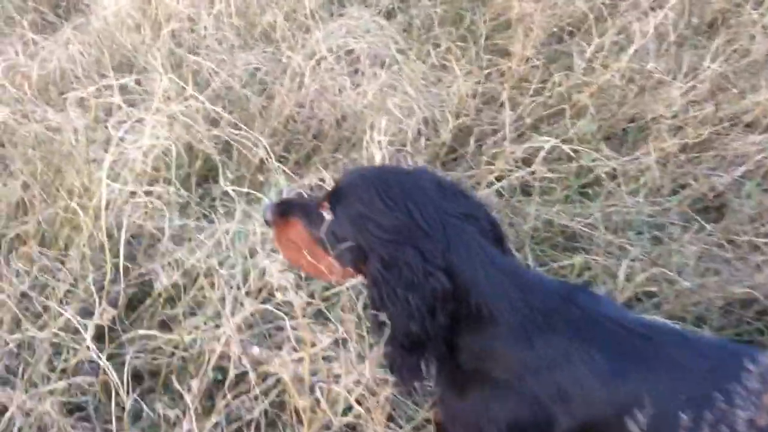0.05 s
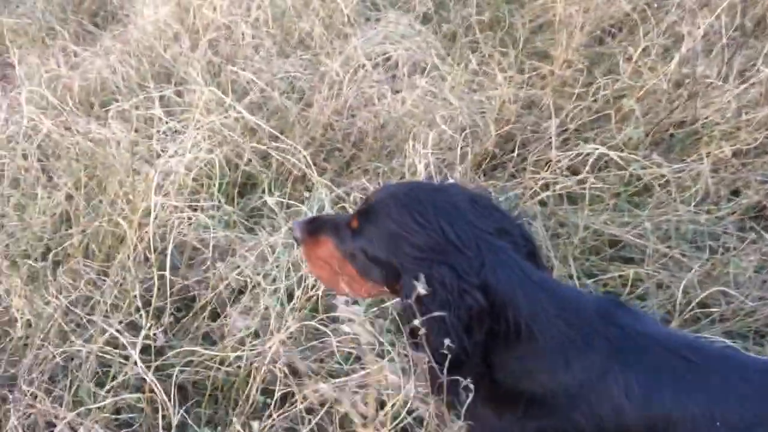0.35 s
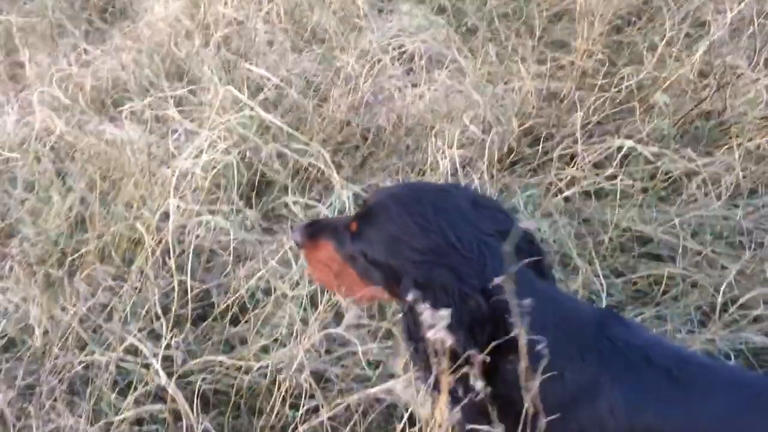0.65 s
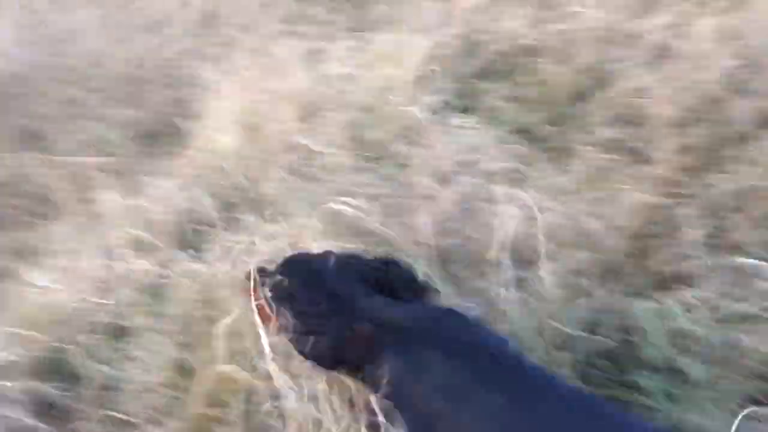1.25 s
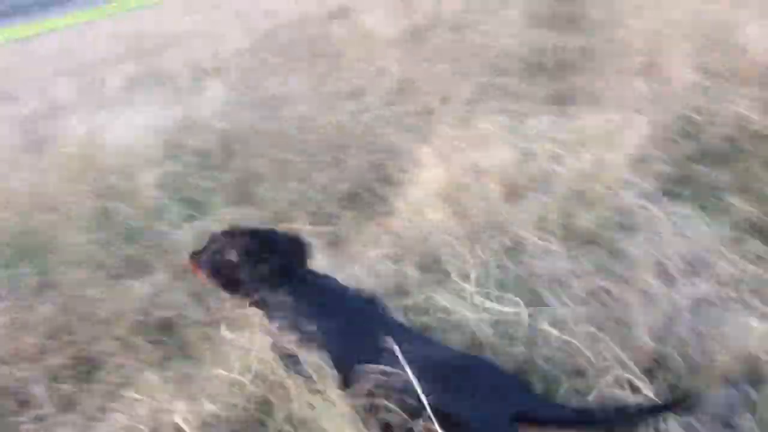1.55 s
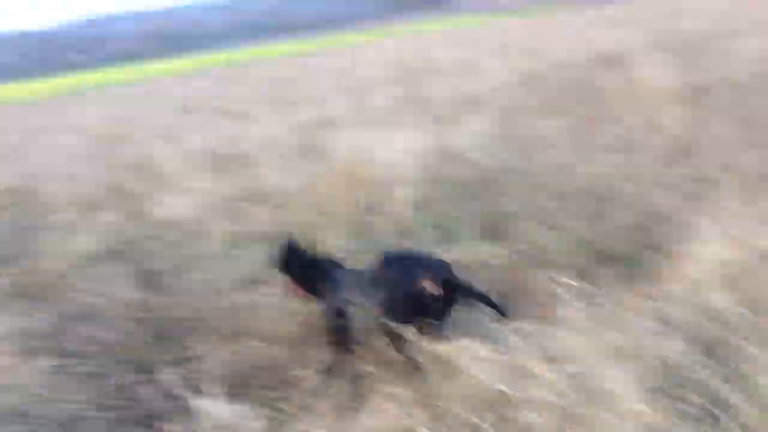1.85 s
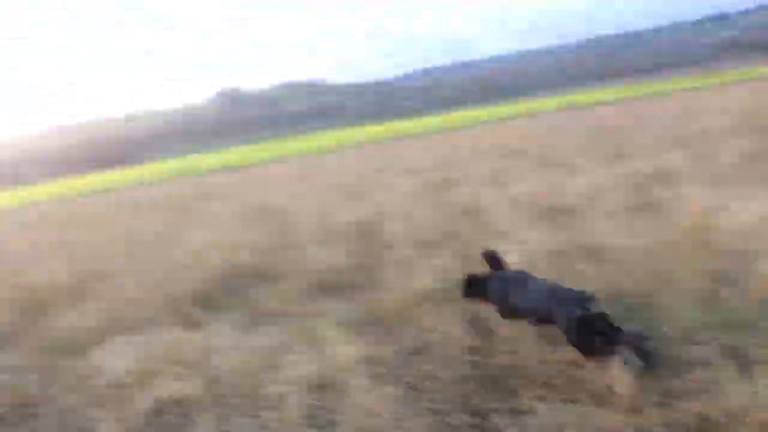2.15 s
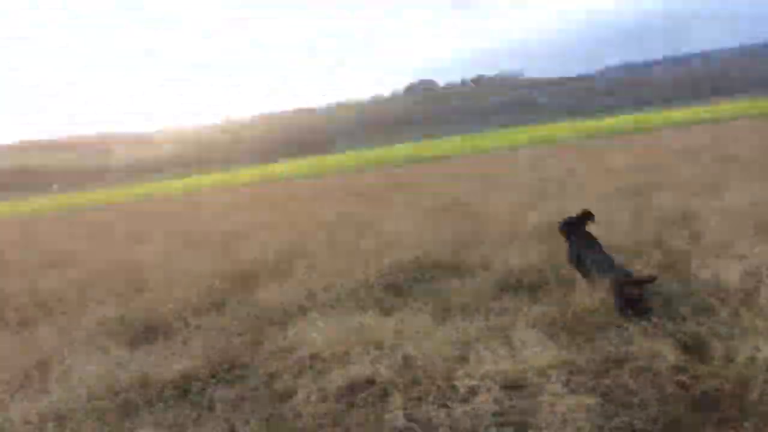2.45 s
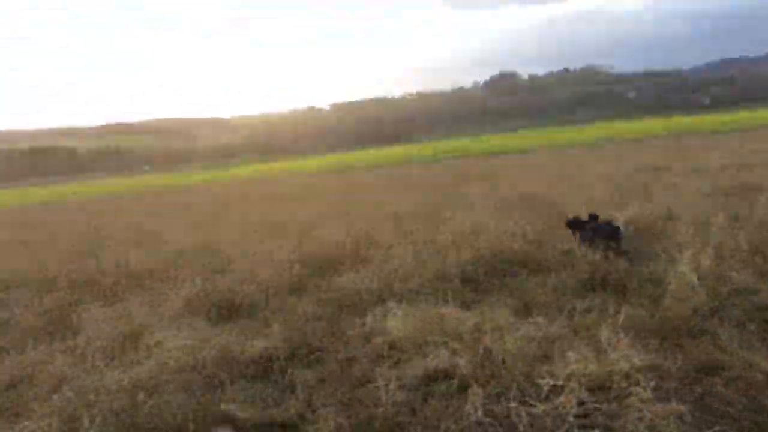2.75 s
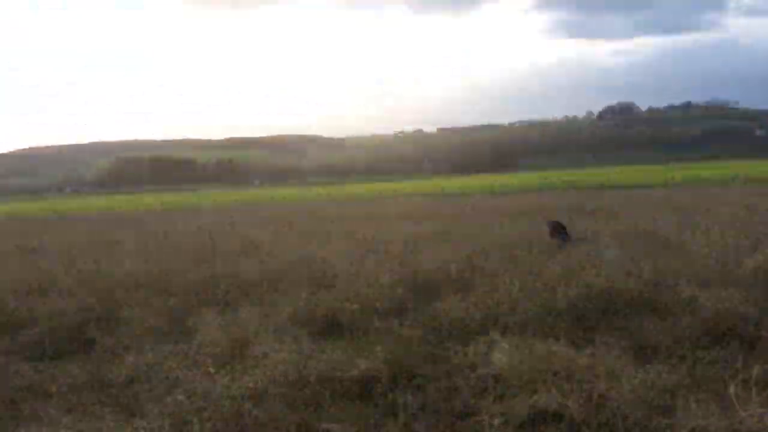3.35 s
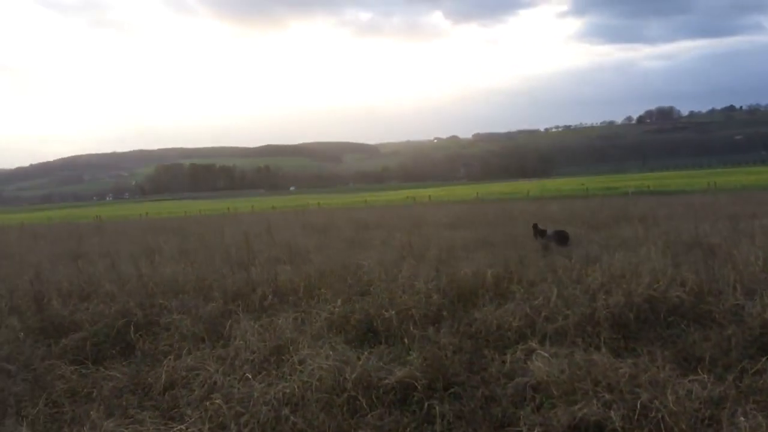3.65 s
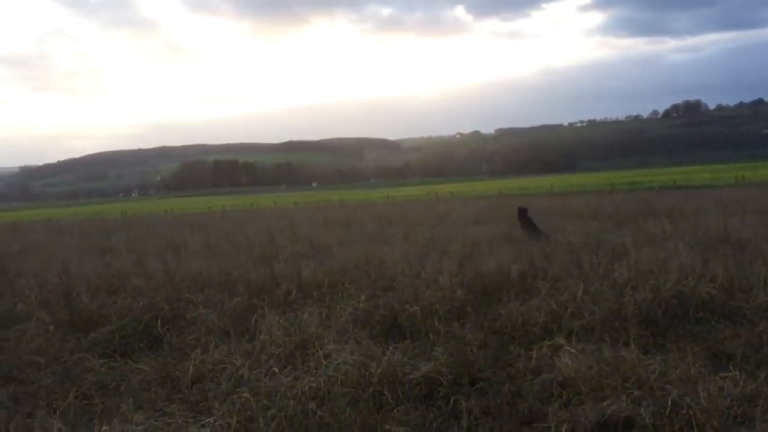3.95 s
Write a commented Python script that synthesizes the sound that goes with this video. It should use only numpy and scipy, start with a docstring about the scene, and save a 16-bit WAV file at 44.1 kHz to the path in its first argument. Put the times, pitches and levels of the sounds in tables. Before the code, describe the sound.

A bird bursts from dry grass with a few wing claps, then whirrs away in fast, fading beats. Stems snap and rustle as a dog bounds after it across an open field, and wind buffets the microphone.

```python
"""Game bird flushed from dry grass

A stem cracks in an open field and a bird claps and thrashes clear of the cover, then whirrs away,
each wingbeat a short hum, a swish and a feather whistle. A dog bounds after it, tearing through
the stalks into the distance. Wind buffets the microphone over a soft hush and a few far peeps."""
import sys
import numpy as np
from scipy import signal
from scipy.fft import rfft, irfft
from scipy.io import wavfile
from scipy.ndimage import uniform_filter1d

SR = 44100
rng = np.random.default_rng(int(sys.argv[2]) if len(sys.argv) > 2 else 0)


def transcribe(signal):
    """Save signal, clipped to [-1, 1], as a 16-bit WAV file at the path in sys.argv[1]."""
    frames = np.atleast_2d(signal).T
    limited = np.clip(frames, -1, 1)
    pcm = np.round(limited * 32767).astype(np.int16)
    wavfile.write(sys.argv[1], SR, pcm)


N = 176400
TIME = np.arange(N) / SR

# Fader for the open-air hush. Each row: time in seconds, level in dB.
HUSH_FADER = [(0, -57.5), (.8, -56), (3.0, -54), (3.2, -58)]
# Tone of the hush. Each row: frequency in Hz, gain in dB.
HUSH_EQ = [(100, 13), (250, -3.5), (500, -2), (1000, -0.5), (1800, -8), (3000, -13.5), (8000, -15.5),
           (16000, -23)]
# Distant birds. Each row: time in seconds, level in dB, pitch in Hz.
FAR_PEEPS = [(2.527, -54.5, 2900), (2.601, -56, 2870), (2.695, -59, 1880), (3.371, -55, 2900)]

# Fader for wind on the microphone. Each row: time in seconds, level in dB.
RUMBLE_FADER = [(0, -61), (.85, -61), (1.0, -51), (1.9, -53.5), (2.25, -48.5), (2.8, -49), (2.87, -38),
                (2.97, -37.5), (3.03, -45.5), (3.12, -37.5), (3.2, -52.5), (3.4, -42.5), (3.53, -45),
                (3.62, -39), (3.8, -42), (3.93, -32), (4, -42.5)]
# Tone of that wind. Each row: frequency in Hz, gain in dB.
RUMBLE_EQ = [(28, -16), (42, 1), (65, 10.5), (110, -4), (170, -9), (260, -27), (700, -74)]
# The strong gust, reaching higher. Each row: frequency in Hz, gain in dB.
GUST_EQ = [(90, 2), (150, 6), (250, -5), (400, -46), (800, -55)]
# Eddies from wind or wings. Each row: time in seconds, level in dB, pitch in Hz, half length in seconds.
EDDY_THUMPS = [(0.785, -42, 81, 0.0085), (0.902, -35, 184, 0.0053), (1.001, -37.5, 197, 0.01),
               (1.089, -32.5, 166, 0.0069), (1.64, -32, 186, 0.0075), (1.772, -35, 72.6, 0.012),
               (2.26, -38, 68.4, 0.017), (2.298, -37, 84, 0.017), (2.479, -32.5, 79, 0.01),
               (2.618, -41, 540, 0.0043), (2.673, -34.5, 68, 0.022), (2.912, -41.5, 136, 0.01),
               (2.968, -32.5, 70, 0.021), (3.081, -31.5, 79, 0.0093), (3.37, -37.5, 83, 0.013),
               (3.585, -36.5, 91, 0.0097), (3.618, -36, 177, 0.011), (3.696, -26.5, 115, 0.016),
               (3.714, -29.5, 450, 0.0041), (3.723, -27.5, 171, 0.006), (3.758, -40.5, 182, 0.02),
               (3.878, -36.5, 181, 0.0086), (3.905, -26.5, 110, 0.0075)]

# Grass stirring before the flush. Each row: time in seconds, level in dB, half length in seconds.
STIR_CUES = [(0.123, -57, 0.073)]
# Tone of the stir. Each row: frequency in Hz, gain in dB.
STIR_EQ = [(1200, -0.5), (2800, -0.5), (4500, -3.5), (9000, -10)]
# Fader for grass brushing past the dog. Each row: time in seconds, level in dB.
RUSTLE_FADER = [(0, -66.5), (.55, -57), (.73, -48), (.86, -57.5), (.9, -39.5), (.935, -60), (1.08, -50.5),
                (1.15, -38), (1.21, -59), (1.29, -50), (1.37, -37.5), (1.48, -35), (1.55, -32), (1.64, -34),
                (1.66, -38), (1.76, -37), (1.95, -43), (2.02, -47), (2.13, -47), (2.31, -57), (2.38, -49),
                (2.44, -56), (2.5, -46.5), (2.57, -53), (2.62, -48), (2.69, -57), (2.95, -52.5),
                (3.17, -56.5), (3.37, -52), (3.6, -53.5), (3.94, -56.5), (4, -52)]
# Tone of the rustle. Each row: frequency in Hz, gain in dB.
RUSTLE_EQ = [(700, -3.5), (1300, -9.5), (2100, -8.5), (3200, -4.5), (4800, -4), (7000, -1), (11000, -1),
             (15000, -3.5)]
# Tufts hit by wings and paws. Each row: time in seconds, level in dB, half length in seconds.
TUFT_HITS = [(0.898, -39, 0.012), (0.92, -39, 0.014), (0.953, -38.5, 0.01), (0.986, -36.5, 0.0036),
             (1.008, -40.5, 0.013), (1.068, -36, 0.0023), (1.088, -33, 0.0024), (1.111, -36.5, 0.0091),
             (1.135, -36.5, 0.0083), (1.165, -36, 0.011), (1.61, -33, 0.022), (1.633, -31.5, 0.0076),
             (2.339, -48, 0.0036), (3.006, -47, 0.0044), (3.467, -52, 0.0077)]
# Tone of their crunch. Each row: frequency in Hz, gain in dB.
TUFT_EQ = [(100, -5), (190, 16.5), (300, -0.5), (1500, 7), (3000, 4), (7000, 4.5), (11000, 4), (16000, -27)]
# Dry stems breaking. Each row: start in seconds, level in dB, ring pitch in Hz.
STEM_SNAPS = [(0.225, -34, 9500), (0.6062, -24.5, 4570), (0.6124, -17, 12100), (0.6171, -12.5, 5840),
              (0.6167, -10.5, 9700), (.8965, -25, 7200), (0.9452, -17, 8300), (0.9835, -22.5, 7200),
              (1.0665, -22, 7500), (1.0858, -21, 7900), (1.131, -13.5, 7050), (1.1368, -12.5, 8000),
              (1.1692, -15.5, 9000), (1.3605, -18, 6240), (1.4441, -13, 10300), (1.509, -19, 9000),
              (1.5344, -5.5, 6900), (1.646, -12.5, 8700), (2.1, -12.5, 9550), (2.217, -26.5, 7800),
              (2.238, -28, 5840), (2.3396, -35, 9700), (2.8818, -24.5, 8700), (3.004, -43, 9500),
              (3.358, -29.5, 9000), (3.683, -35, 6130)]
# Tone of the splintering. Each row: frequency in Hz, gain in dB.
SPLINTER_EQ = [(1200, -13), (3000, -8), (6500, 3), (15000, -0.5)]

# Fader for the low flutter of air under the wings. Each row: time in seconds, level in dB.
FLUTTER_FADER = [(.87, -79), (.9, -40), (1.2, -38.5), (1.33, -48), (1.45, -42), (1.55, -51.5), (1.7, -45.5),
                 (2.4, -84)]
# Tone of the flutter. Each row: frequency in Hz, gain in dB.
FLUTTER_EQ = [(50, -1), (110, -3), (170, -0.5), (240, -1), (350, -13), (700, -14.5), (1400, -20),
              (3000, -24)]
# Wing downstrokes. Each row: time in seconds, hum level in dB.
DOWNSTROKES = [(1.033, -38), (1.109, -38), (1.182, -34), (1.256, -32), (1.329, -34), (1.402, -32.5),
               (1.477, -32), (1.549, -34.5), (1.621, -36), (1.697, -38), (1.767, -38.5), (1.839, -37),
               (1.914, -45.5), (1.99, -36), (2.067, -36.5), (2.141, -35), (2.218, -41.5), (2.29, -46),
               (2.366, -47), (2.442, -47), (2.519, -44), (2.597, -52), (2.67, -49)]
# Tone of the wing swish. Each row: frequency in Hz, gain in dB.
SWISH_EQ = [(150, -26), (450, 4), (1000, 3.5), (1500, -2), (2300, -7.5), (3300, -3), (5000, -11),
            (12000, -42)]
# Wing claps at take-off. Each row: start in seconds, level in dB.
CLAP_HITS = [(1.03, -29.5), (1.1055, -23.5), (1.18, -27.5)]
# The ring of a clap. Each row: pitch in Hz, gain in dB, seconds to fall by 60 dB.
CLAP_RING = [(188, -3, 0.062), (678, -2, 0.018), (1090, -5, 0.021)]

EDDY_ROUGH, WING_PITCH_SCATTER = 0.74, 0.044


def from_db(db):
    """Decibels to gain."""
    return 10 ** (np.asarray(db) / 20)


def unit_power(x):
    """Scale to an RMS of one."""
    return x / np.sqrt(np.mean(x ** 2) + 1e-20)


def fader(rows):
    """Ride the gain through points of time and level."""
    return from_db(np.interp(TIME, *np.transpose(rows)))


def swell(peak_s, rise_s, fall_s):
    """A bell-shaped rise and fall around a moment."""
    return np.exp(-np.minimum(((TIME - peak_s) / np.where(TIME < peak_s, rise_s, fall_s)) ** 2, 60))


def lumps(spread_db, length_s):
    """A gain that wanders at random from one short moment to the next."""
    steps = rng.standard_normal(4000)
    return unit_power(from_db(spread_db * np.interp(TIME / length_s, np.arange(len(steps)), steps)))


def colour(x, eq):
    """Apply an EQ curve, rolling off the bass below its first point; unit power."""
    hz, db = np.transpose(eq)
    freqs = np.arange(N // 2 + 1) * SR / N + 1e-3
    curve = from_db(np.interp(np.log(freqs), np.log(hz), db))
    bass_loss = np.sqrt(1 + (hz[0] / freqs / np.sqrt(2)) ** 4)
    return unit_power(irfft(rfft(x) * curve / bass_loss, N))


def noise(eq):
    """Smooth coloured noise."""
    return colour(rng.standard_normal(N), eq)


def steady(x, window_s):
    """Hold the power of a noise steady over a short window."""
    power = uniform_filter1d(x ** 2, size=max(int(window_s * SR), 2))
    return x / np.sqrt(np.abs(power) + 1e-9)


def air_tone(peak_s, hz, rise_s, fall_s, rough=EDDY_ROUGH, sag_hz_per_s=0):
    """A short tone of set energy, roughened in level and phase, with an optional downward glide."""
    out = np.zeros(N)
    near = np.abs(TIME - peak_s) < 3 * max(rise_s, fall_s)
    t = TIME[near] - peak_s
    knots = np.linspace(-3, 3, 13) * fall_s
    wobble = np.interp(t, knots, rng.standard_normal(13) + 1j * rng.standard_normal(13))
    bell = np.exp(-(t / np.where(t < 0, rise_s, fall_s)) ** 2)
    cycles = hz * t - sag_hz_per_s * t * t / 2 + rng.random()
    wave = (1 + rough * wobble) * np.exp(2j * np.pi * cycles)
    out[near] = unit_power(bell * wave.real) * np.sqrt(np.mean(bell ** 2))
    return out


def crackle(eq, tick_share, ticks_per_s=1500, spread_db=5):
    """Tiny stalk contacts, carrying a share of the power, over a smooth sliding hiss."""
    sizes = from_db(spread_db * np.minimum(rng.exponential(1, N), 4)) * rng.choice([-1, 1], N)
    ticks = unit_power(sizes * (rng.random(N) < ticks_per_s / SR))
    hiss = rng.standard_normal(N)
    return colour(np.sqrt(tick_share) * ticks + np.sqrt(1 - tick_share) * hiss, eq)


def open_field():
    """The bed: the hush of open country and a few far bird peeps."""
    peeps = sum(from_db(db) * air_tone(s, hz, 0.009, 0.009, rough=2.3, sag_hz_per_s=3000)
                for s, db, hz in FAR_PEEPS)
    return fader(HUSH_FADER) * noise(HUSH_EQ) + peeps


def wind():
    """Low rumble, one stronger gust, and single eddies thumping the microphone."""
    thumps = sum(from_db(db) * air_tone(s, hz, half_s, half_s) for s, db, hz, half_s in EDDY_THUMPS)
    gust = from_db(-45.5) * swell(peak_s=3.72, rise_s=0.25, fall_s=0.25) * noise(GUST_EQ)
    rumble_gain = fader(RUMBLE_FADER) * lumps(spread_db=2, length_s=0.035)
    return rumble_gain * steady(noise(RUMBLE_EQ), window_s=0.108) + gust + thumps


def grass():
    """A soft stir, a rustle as stalks give way in clumps, and coarse crunches where tufts are hit."""
    stirred = sum(from_db(db) * swell(s, half_s, half_s) for s, db, half_s in STIR_CUES)
    struck = sum(from_db(db) * swell(s, half_s, half_s) for s, db, half_s in TUFT_HITS)
    clumps = lumps(spread_db=2, length_s=0.018)
    rustle = fader(RUSTLE_FADER) * clumps * crackle(RUSTLE_EQ, tick_share=0.17)
    return stirred * noise(STIR_EQ) + rustle + struck * crackle(TUFT_EQ, tick_share=0.79)


def stem_snaps(ring_cycles=1.77, splinter_db=-12.5, splinter_decay_s=0.0018, low_cut_hz=2150):
    """A breaking stem rings for a few cycles and splinters briefly; it is too thin to radiate bass."""
    rings, splinter_gain = np.zeros((2, N))
    t = TIME[:SR // 40]
    for s, db, hz in STEM_SNAPS:
        span = int(s * SR) + np.arange(len(t))
        rings[span] += from_db(db) * np.sin(2 * np.pi * hz * t) * np.exp(-t * hz / ring_cycles)
        splinter_gain[span] += from_db(db + splinter_db) * np.exp(-t / splinter_decay_s)
    low_cut = signal.butter(1, low_cut_hz, "high", fs=SR, output="sos")
    return signal.sosfilt(low_cut, rings + splinter_gain * noise(SPLINTER_EQ) + 1e-18)


def wingbeats(launch_hz=570, cruise_hz=438.4, settle_s=0.16, stroke_s=0.0065):
    """Each downstroke hums, pushes air, swishes and whistles; an upstroke and stray eddies follow."""
    out, swish_gain = np.zeros((2, N))
    # The bird recedes: nine last beats fade at 11 dB a second.
    far_beats = [(DOWNSTROKES[-1][0] + t, -54 - 11 * t) for t in 0.086 * np.arange(1, 10)]
    for s, hum_db in DOWNSTROKES + far_beats:
        flown_s = s - DOWNSTROKES[0][0]
        effort = np.exp(-flown_s / settle_s)  # the hum sinks and smooths as the bird gets under way
        hz = cruise_hz + effort * (launch_hz - cruise_hz)
        hz *= 1 + WING_PITCH_SCATTER * rng.standard_normal()
        rough = 0.55 + effort
        hum = from_db(hum_db) * air_tone(s, hz, stroke_s, 0.0079, rough)
        overtone = from_db(hum_db - 20) * air_tone(s, 2 * hz, stroke_s, stroke_s, rough)

        swish_s = s - 0.00188
        swish_db = hum_db - 2.5 - 11.5 * flown_s  # dies away sooner than the hum
        swish_gain += from_db(swish_db) * swell(swish_s, rise_s=0.00335, fall_s=0.0067)
        push = from_db(swish_db - 7.5) * air_tone(s, hz=278, rise_s=stroke_s, fall_s=stroke_s)
        whistle = from_db(swish_db - 4.5) * air_tone(
            swish_s, hz=3185, rise_s=0.0063, fall_s=0.0063, rough=1, sag_hz_per_s=61000)

        upstroke_s = s + 0.0205
        upstroke = from_db(hum_db + rng.normal(-5, 1.7)) * air_tone(upstroke_s, hz, 0.0031, 0.0031)
        out += hum + overtone + push + whistle + upstroke
        for lag_s in (0.018, 0.036):  # churned air between strokes
            eddy_hz = hz * np.exp(0.14 * rng.standard_normal())
            out += from_db(hum_db / 2 - 30) * air_tone(upstroke_s + lag_s, eddy_hz, stroke_s, stroke_s)
    flutter_gain = fader(FLUTTER_FADER) * lumps(spread_db=4, length_s=0.012)
    flutter = flutter_gain * steady(noise(FLUTTER_EQ), window_s=0.037)
    return out + swish_gain * noise(SWISH_EQ) + flutter


def wing_claps():
    """The wings meet: a sudden low thump with a hollow slap on top."""
    out = np.zeros(N)
    for s, db in CLAP_HITS:
        t = np.maximum(TIME - s, 0)
        for hz, mode_db, t60 in CLAP_RING:
            pitch = hz * (1 + WING_PITCH_SCATTER * rng.standard_normal())
            decay_db = 60 * np.minimum(t / t60, 4)
            out += from_db(db + mode_db - decay_db) * np.sin(2 * np.pi * pitch * t)
    return out


def scene():
    """A mono mix with no echoes."""
    return (wingbeats() + wing_claps() + grass() + stem_snaps() + wind() + open_field())[None]


def record(dry):
    """The microphone loses the deepest bass; the top is cut steeply."""
    low_cut = signal.butter(2, 24.4, "high", fs=SR, output="sos")
    high_cut = signal.ellip(10, .1, 80, 15300, fs=SR, output="sos")
    return signal.sosfilt(high_cut, signal.sosfilt(low_cut, dry))


dry = scene()
out = record(dry)
transcribe(out)
```